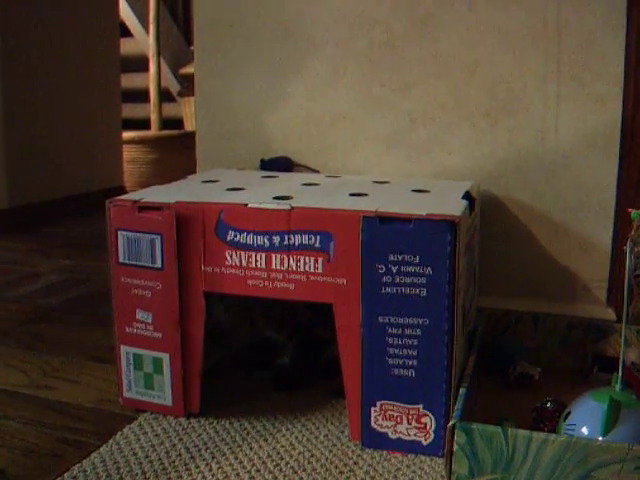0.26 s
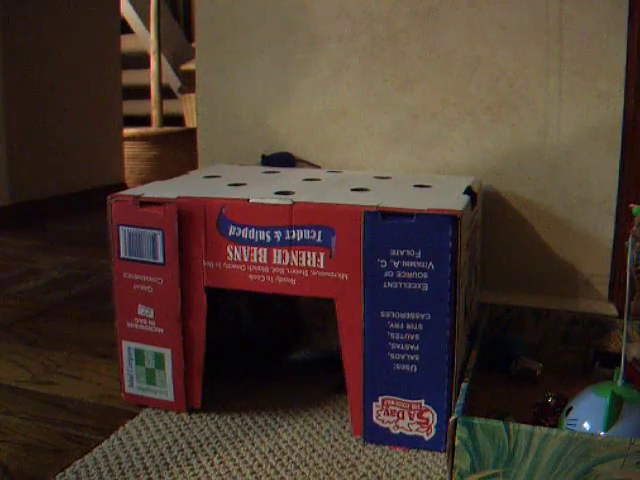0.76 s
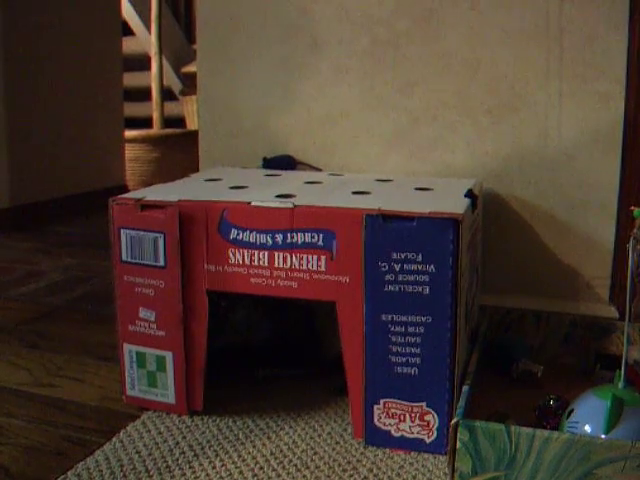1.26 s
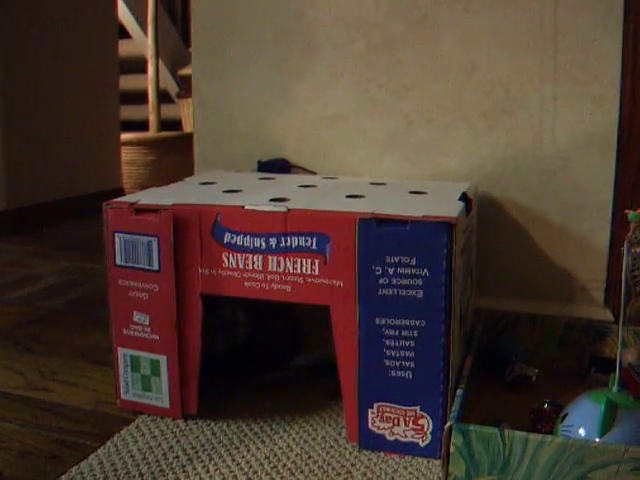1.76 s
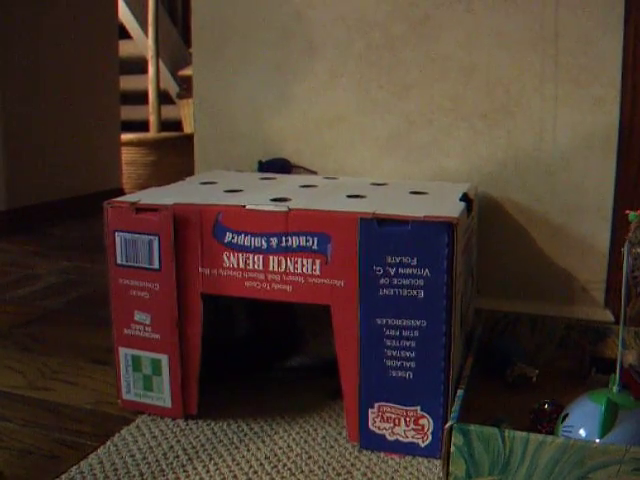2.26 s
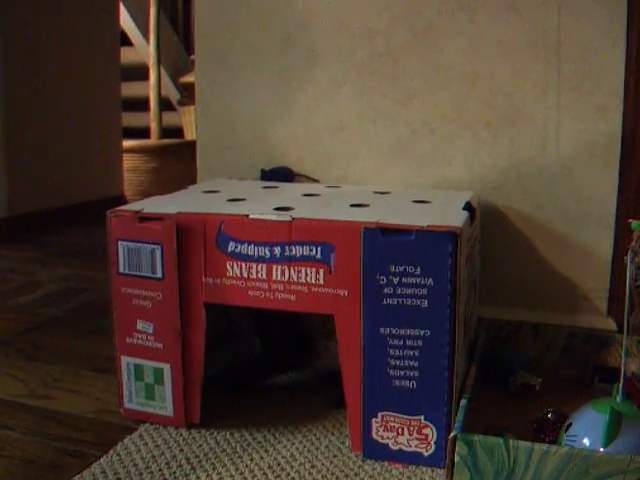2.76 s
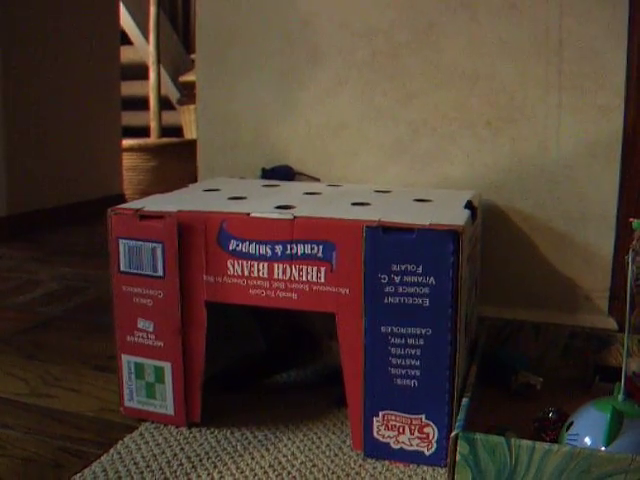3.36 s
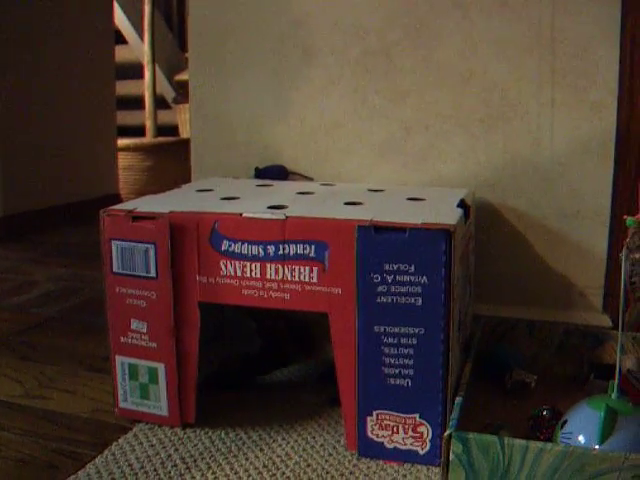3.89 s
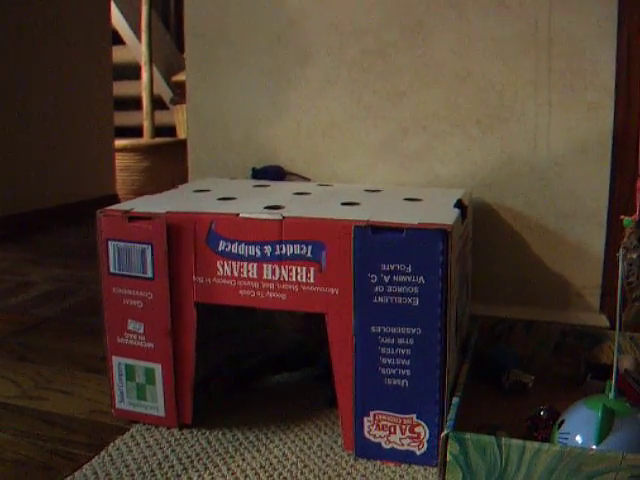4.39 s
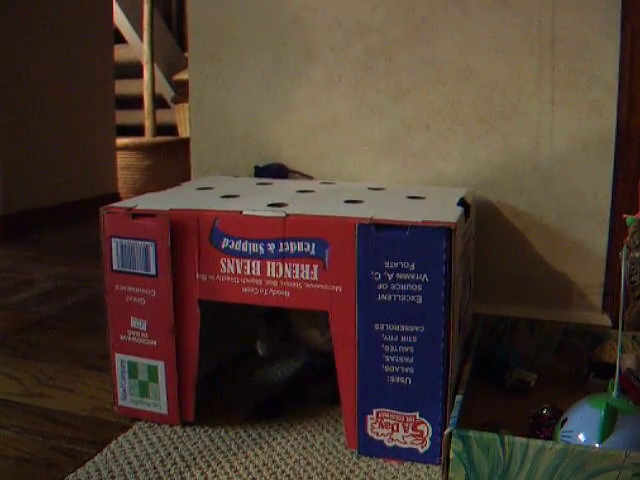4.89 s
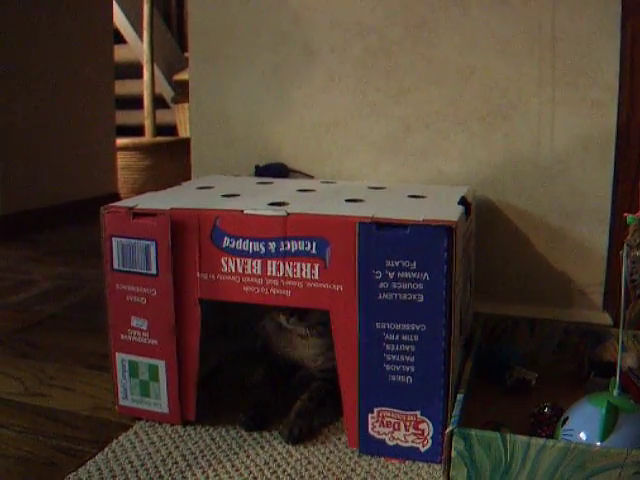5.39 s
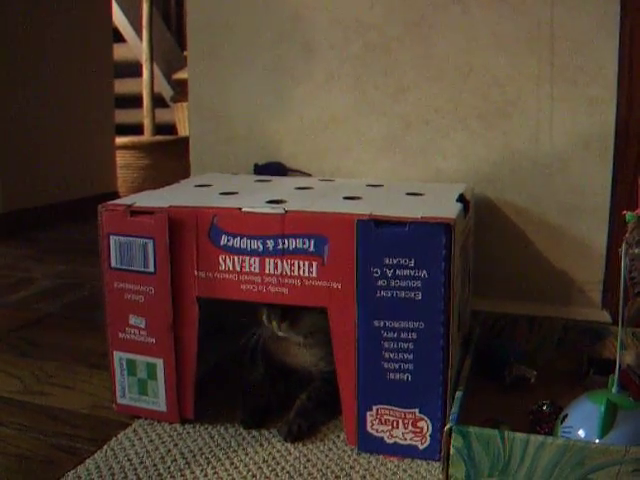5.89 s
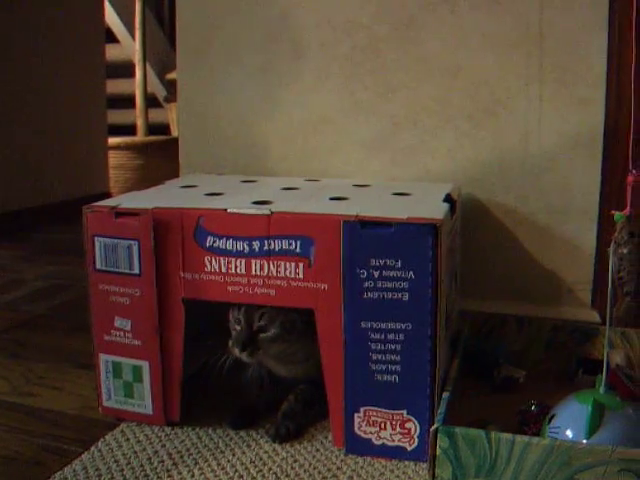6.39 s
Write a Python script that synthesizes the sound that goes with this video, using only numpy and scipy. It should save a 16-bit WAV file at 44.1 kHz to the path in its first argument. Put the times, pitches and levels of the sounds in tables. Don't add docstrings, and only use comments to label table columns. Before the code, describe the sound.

A cat shifts inside a cardboard box in a quiet room. Sparse dry claw taps, short fibrous scrapes and soft hollow knocks come in small clusters over the first four and a half seconds. A sharp camera button tick follows, then dull steps on a rug and a quick run of flank bumps against the card. A small cheap camera adds grainy hiss and a faint high whine over distant rumble and hum.

```python
import sys
import numpy as np
from scipy import signal
from scipy.fft import rfft, irfft, next_fast_len
from scipy.io import wavfile

SR = 44100
rng = np.random.default_rng(int(sys.argv[2]) if len(sys.argv) > 2 else 0)


def generate_wav(sig):
    pcm = np.round(np.clip(np.atleast_2d(sig).T, -1, 1) * 32767).astype(np.int16)
    wavfile.write(sys.argv[1], SR, pcm)


def to_linear_factor(level_db):
    exponent = np.asarray(level_db, float) / 20
    return 10 ** exponent


N = 292868


def unit(x):
    return x / np.sqrt(np.mean(x ** 2) + 1e-20)


def along(points, hz):
    f, value = np.transpose(points)
    return np.interp(np.log(hz + 1), np.log(f + 1), value)


def filtered(x, response):
    m = next_fast_len(len(x) + 4096)
    spectrum = rfft(x, m) * response(np.fft.rfftfreq(m, 1 / SR))
    return irfft(spectrum, m)[:len(x)]


def mode(hz, width):
    return lambda f: 1j * f * width / (hz * hz - f * f + 1j * f * width)


def add(track, start_s, sound):
    part = track[max(round(start_s * SR), 0):][:len(sound)]
    part += sound[:len(part)]


# [start t/s, length t/s, level/dB rms, wall tone f/Hz]
FUR_BRUSHES = [(0, .2, -56.5, 1866), (0.941, 0.013, -40.5, 1735), (1.04, 0.051, -50.5, 710),
               (1.718, .093, -46.5, 1246), (1.933, .013, -37.5, 2420), (1.94, 0.039, -46.5, 867),
               (2.112, .022, -44, 1086), (3.75, .052, -45, 748), (3.779, .065, -45, 1025),
               (5.964, 0.14, -55, 854), (6.079, .046, -48, 616), (6.112, 0.027, -42, 603),
               (6.142, 0.026, -49, 596), (6.175, .032, -45, 557), (6.189, 0.027, -46, 528),
               (6.211, 0.17, -55, 592)]
# [start t/s, length t/s, level/dB rms, low tone f/Hz, high tone f/Hz]
CLAW_CATCHES = [(0.691, 0.022, -49.5, 1840, 2520), (1.133, 0.042, -45.5, 1300, 2210),
                (1.823, 0.024, -42, 2350, 3000), (1.842, 0.039, -36, 1273, 2500),
                (1.846, .03, -35.5, 2616, 3020), (2.03, .025, -40.5, 1540, 2470),
                (2.049, .03, -38.5, 1150, 1484), (2.387, 0.034, -41.5, 557, 1230),
                (2.884, .02, -42, 885, 1990), (3.958, .031, -36, 1615, 3010),
                (4.561, 0.029, -37, 1794, 2300), (4.581, 0.038, -34.5, 1695, 2300),
                (4.602, 0.015, -33.5, 1660, 2665)]
# [start t/s, length t/s, level/dB rms, wall tone f/Hz]
PAD_DRAGS = [(0.731, .05, -46.5, 2110), (0.771, 0.048, -45, 1420), (1.072, 0.095, -52, 900),
             (1.21, .036, -47, 700), (1.859, 0.027, -40, 1350), (2.016, 0.032, -39.5, 900),
             (2.039, .027, -45, 2810), (2.879, .0062, -42, 1370), (3.723, .025, -40, 840),
             (3.856, .018, -43, 2950), (3.874, .028, -44, 2950), (4.417, .025, -32.5, 830),
             (4.438, 0.026, -47.5, 750)]


def scrapes():
    track, t = np.zeros(N), np.arange(SR // 4) / SR
    strokes = [(*claw, -10.5) for claw in CLAW_CATCHES]
    strokes += [(*drag, drag[-1] + 823, -3.5) for drag in PAD_DRAGS]
    strokes += [(*brush, brush[-1] + 1500, 3.5) for brush in FUR_BRUSHES]
    for start_s, length_s, db, low_hz, high_hz, hiss_db in strokes:
        grip = np.repeat(rng.standard_normal(len(t) // 40 + 1), 40)[:len(t)]
        progress = np.clip(t / max(length_s, .01), 0, 1)
        swell = np.sqrt(np.abs(np.sin(np.pi * progress ** .6))) * (progress < 1)
        stroke = swell * unit(to_linear_factor(2.2 * grip))
        ring, rasp, fur = stroke * rng.standard_normal((3, len(t)))

        blur = np.clip(.1 - .012 * (db + 37.5), .06, .35)
        low, high = mode(low_hz, blur * low_hz), mode(high_hz, 1.25 * blur * high_hz)
        box, wide, hiss = mode(670, 110), mode(1.55 * high_hz, 2400), mode(6800, 3500)
        tones = filtered(ring, lambda f: (0.96 * low(f) - 0.58 * high(f)) / np.sqrt(blur) + 0.63 * box(f))
        air = 0.74 * filtered(rasp, lambda f: wide(f) ** 2)
        air += to_linear_factor(hiss_db + 0.5) * filtered(fur, lambda f: hiss(f) ** 2)
        add(track, start_s, to_linear_factor(db + 4.5) * (tones + air))
    return track


# [f/Hz, level/dB per Hz]
RUMBLE_COLOUR = [(15, -3), (50, -5), (85, 0.5), (160, -7.5), (330, -8), (450, -7.5), (700, -9),
                 (1000, -12.5), (1500, -19.5), (3000, -22), (7800, -26.5)]
# [f/Hz, wander f/Hz, level/dB rms]
HUM_TONES = [(119.4, 3, -67.5), (197.3, 3, -64.5), (246.2, 3, -58.5), (325, 6, -67.5), (638.6, 5, -71)]


def house():
    sound = to_linear_factor(-53) * unit(filtered(rng.standard_normal(N), lambda f: to_linear_factor(along(RUMBLE_COLOUR, f))))
    for hz, wander_hz, db in HUM_TONES:
        drift, swell = (unit(filtered(noise, lambda f: 1 / (1 + (f / 6) ** 2)))
                        for noise in rng.standard_normal((2, N)))
        phase = 2 * np.pi * np.cumsum(hz + wander_hz * drift) / SR
        sound = sound + to_linear_factor(db + 1.5 + 2 * swell) * np.sin(phase)
    return sound


def whine():
    t = np.arange(N) / SR
    flip = np.sign(np.sin(2 * np.pi * 14.67 * t))
    return to_linear_factor(-53) * np.sin(2 * np.pi * 7692.35 * t) * flip


# [t/s, peak level/dB, wall tone f/Hz, bright crack level/dB, 60 dB fade t/s]
CLAW_TAPS = [(0.6006, -34.5, 1350, -1, 0.041), (0.9408, -37, 2690, -1.5, .048),
             (1.037, -28, 2050, -10, 0.033), (1.0652, -22, 2560, -20.5, 0.044),
             (1.2055, -39.5, 1890, -6, .04), (1.219, -35, 2300, -6, 0.038), (1.7094, -25, 1950, -7, 0.079),
             (1.722, -19, 3020, -13, .038), (1.934, -32, 3260, -16, 0.022),
             (1.9547, -33.5, 1380, -20, .056), (2.0112, -28.5, 1930, -7, .016),
             (2.1158, -32, 3660, -13, .044), (2.342, -40.5, 3530, -2.5, .04), (2.376, -37, 2930, -13, .035),
             (2.391, -30, 2790, -4, .047), (2.8916, -29.5, 2045, -30, 0.034),
             (3.7250, -27.5, 1500, -6, 0.074), (3.8602, -38.5, 3200, -10, 0.072),
             (3.951, -35, 2560, -15, .095), (4.4148, -27, 1270, -14.5, .053),
             (4.564, -23, 1890, -18, 0.034), (6.0713, -42.5, 1150, 0.5, 0.026),
             (6.1949, -29.5, 1205, -38, 0.044)]


def taps():
    track, t = np.zeros(N), np.arange(SR // 8) / SR
    for start_s, db, hz, crack_db, t60 in CLAW_TAPS:
        overtone_db = -9 + 5 * np.log2(hz / 2000)
        rattle, crack = rng.standard_normal((2, len(t)))
        rattle[8] = crack[8] = np.clip(.6 * (db + 39), 1, 12)

        tone, overtone = mode(hz, 0.87 * hz), mode(min(1.9 * hz, 7000), 1.7 * hz)
        wall = unit(filtered(rattle, lambda f: tone(f) ** 2 + to_linear_factor(overtone_db) * overtone(f) ** 2))
        tip = unit(filtered(crack, lambda f: mode(6300, 4500)(f) ** 2))

        blow = 0.63 * to_linear_factor(-60 * t / max(.45 * t60, .003))
        buzz = .4 * to_linear_factor(-60 * t / max(1.3 * t60, .004))
        tip *= to_linear_factor(crack_db - 60 * t / max(0.74 * t60, .003))
        attack = 1 - np.exp(-t / 0.00032)
        add(track, start_s + .0007, to_linear_factor(db - 3.0) * (wall * (blow + buzz) + tip) * attack)
    return track


# [t/s, peak level/dB, panel tone f/Hz, hollow ring level/dB, 60 dB fade t/s]
PAW_KNOCKS = [(.602, -39, 330, -6, 0.077), (.943, -34, 358, 2.3, 0.11), (1.04, -40, 304, -2, 0.1),
              (1.067, -32.5, 333, 2.2, 0.045), (1.208, -41, 330, -4.5, 0.077),
              (1.222, -35.5, 330, -2.5, .11), (1.710, -42.5, 336, -0.5, 0.11),
              (1.936, -44.5, 244.5, 5.5, 0.15), (2.02, -46, 328, 4.5, .13), (2.05, -46.5, 322, 1, .12),
              (2.39, -29.5, 361, -5, .08), (2.4, -35.5, 257.6, -1, 0.16), (2.891, -41.5, 331, -1, .055),
              (3.727, -44, 249.5, 2.5, 0.08), (4.416, -41, 344, 11, 0.042), (4.565, -47.5, 297, 10, 0.094)]
# [t/s, peak level/dB, tone f/Hz, 60 dB fade t/s]
RUG_STEPS = [
    (1.068, -36, 153.5, .08),
    (2.394, -35, 140.3, 0.15),
    (2.882, -42, 202, .05),
    (5.437, -31, 232, 0.069),
    (5.722, -30, 270, .055),
    (5.884, -24, 204.6, .04),
    (5.892, -31, 275, .038),
]
# [t/s, peak level/dB, panel tone f/Hz, 60 dB fade t/s]
FLANK_BUMPS = [
    (6.108, -35.5, 251.5, 0.073),
    (6.122, -36.5, 134, 0.046),
    (6.146, -28.5, 325, .028),
    (6.179, -29.5, 282, 0.069),
    (6.195, -20, 312, .046),
    (6.213, -37.5, 260, .05),
]


def thumps():
    track, t = np.zeros(N), np.arange(SR // 4) / SR
    pushes = [(*knock, -5.5 - .5 * (knock[1] + 40)) for knock in PAW_KNOCKS]
    pushes += [(s, db, hz, -18.5, t60, -23.5) for s, db, hz, t60 in RUG_STEPS]
    pushes += [(s, db, hz, -11.5, t60, -9.5) for s, db, hz, t60 in FLANK_BUMPS]
    for start_s, db, hz, hollow_db, t60, puff_db in pushes:
        beat = rng.uniform(.9, 1.1, 2)
        panel = np.sin(2 * np.pi * hz * t) + 0.32 * np.sin(2 * np.pi * .72 * hz * beat[0] * t)
        slower = np.maximum(to_linear_factor(-26 * t / max(t60, .01)), 1e-3)
        hollow = np.sin(2 * np.pi * 668 * t) / slower + .5 * np.sin(2 * np.pi * 780 * beat[1] * t)
        puff = unit(filtered(rng.standard_normal(len(t)), lambda f: mode(1.7 * hz, 1.9 * hz)(f) ** 2))
        fade = to_linear_factor(-60 * t / max(t60, .01)) * (1 - np.exp(-t / 0.0012))
        ring = (panel + to_linear_factor(hollow_db) * hollow) * fade
        add(track, start_s, to_linear_factor(db - 2.5) * (ring + to_linear_factor(puff_db) * puff * np.sqrt(fade)))
    return track


# [f/Hz, 60 dB fade t/s]
ROOM_FADES = [(150, 0.33), (1000, 0.27), (3000, 0.22), (8000, 0.12)]


def reverb(x):
    hz, t, z = signal.stft(rng.standard_normal(SR // 2), SR, nperseg=256)
    fade = to_linear_factor(-60 * t / along(ROOM_FADES, hz)[:, None])
    tail = signal.istft(z * fade, SR, nperseg=256)[1]
    late = np.pad(x, (300, 0))
    return signal.fftconvolve(late, tail / np.linalg.norm(tail))[:N]


# [t/s, peak level/dB]
BUTTON_TICKS = [
    (5.436, -10),
]
# [f/Hz, level/dB, 60 dB fade t/s]
CASE_TONES = [(494, -27, 0.022), (830, -23, 0.022), (1370, -18.5, 0.014), (2300, -13, 0.0085),
              (3200, -15, 0.0071), (4100, -5, 0.0067), (5920, 3.5, 0.0017), (7760, -10.5, 0.0086)]


def button():
    track, t = np.zeros(N), np.arange(SR // 20) / SR
    ring = np.zeros(len(t))
    for k, (hz, db, t60) in enumerate(CASE_TONES):
        ring += (-1) ** k * to_linear_factor(db - 60 * t / t60) * np.sin(2 * np.pi * hz * t)
    for start_s, db in BUTTON_TICKS:
        add(track, start_s, to_linear_factor(db + 4) * ring * (1 - np.exp(-t / 0.00019)))
    return track


def scene():
    box = scrapes() + taps() + thumps()
    return (box + to_linear_factor(-11) * reverb(box) + house() + button())[None]


def coarse_steps(sound):
    step = 1 / 128 / np.sqrt(2)
    slow = signal.resample_poly(sound, 160, 441)
    return step * np.floor(slow / step + .06)


# [f/Hz, level/dB]
SOFT_FILTER = [(7000, 0), (7500, -1), (7700, -2), (8000, -6), (8300, -11), (8600, -21), (8900, -36),
               (9150, -50), (9300, -70)]


def back_to_full_rate(slow):
    slow = np.pad(slow, (0, -len(slow) % 160 + 1600), "edge")
    m = len(slow) // 160 * 441
    bins = np.arange(m // 2 + 1)
    mirrored = np.fft.fft(slow)[bins % len(slow)]
    mirrored = mirrored * to_linear_factor(along(SOFT_FILTER, bins * SR / m))
    return irfft(mirrored, m)[None, :N] * m / len(slow)


def roll_off(x):
    return signal.sosfilt(signal.butter(12, 9150, fs=SR, output="sos"), x)


def record(dry):
    slow = coarse_steps(dry[0] + whine())
    mix = back_to_full_rate(slow)
    return roll_off(mix)


dry = scene()
out = record(dry)
generate_wav(out)
```